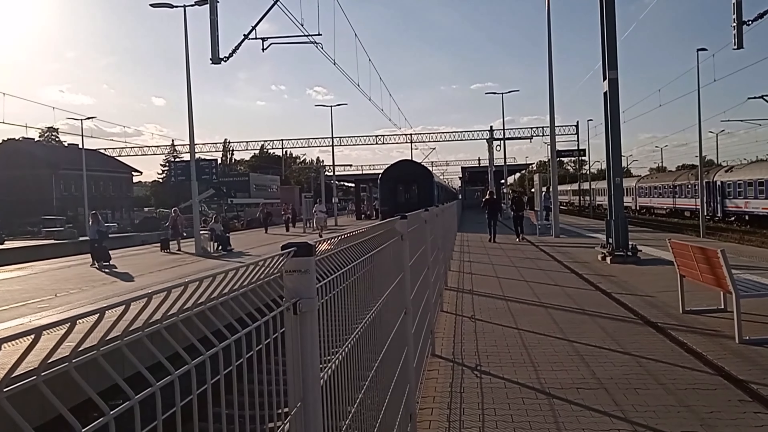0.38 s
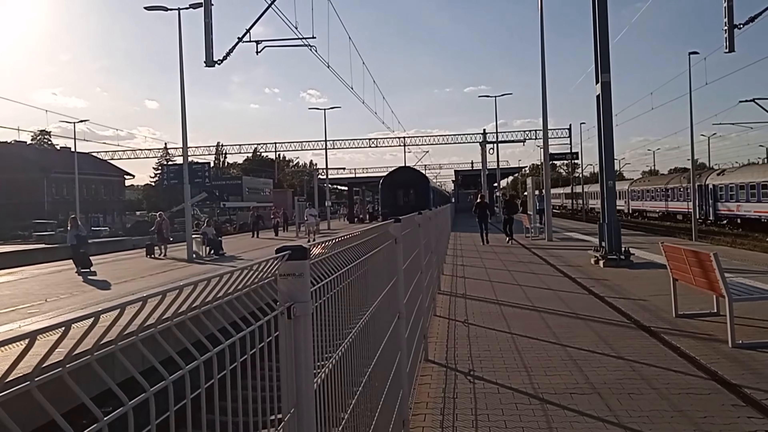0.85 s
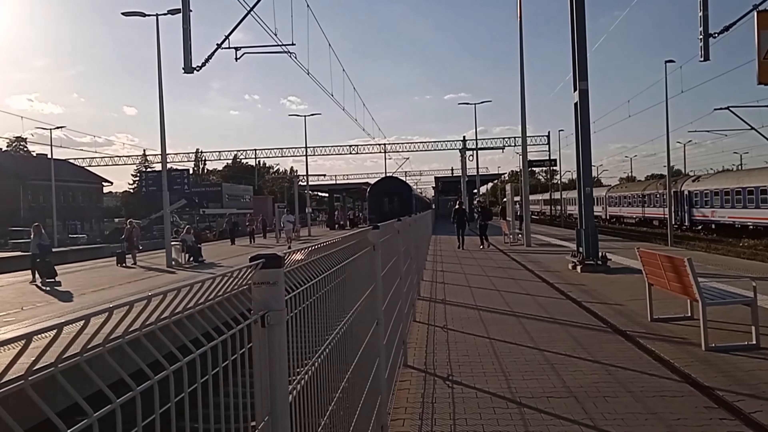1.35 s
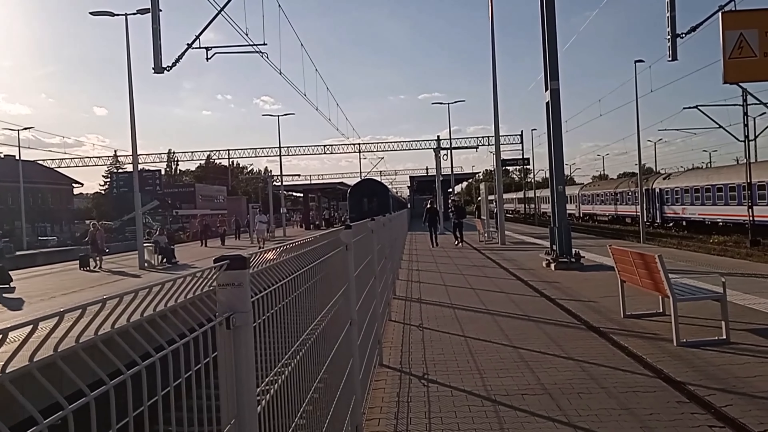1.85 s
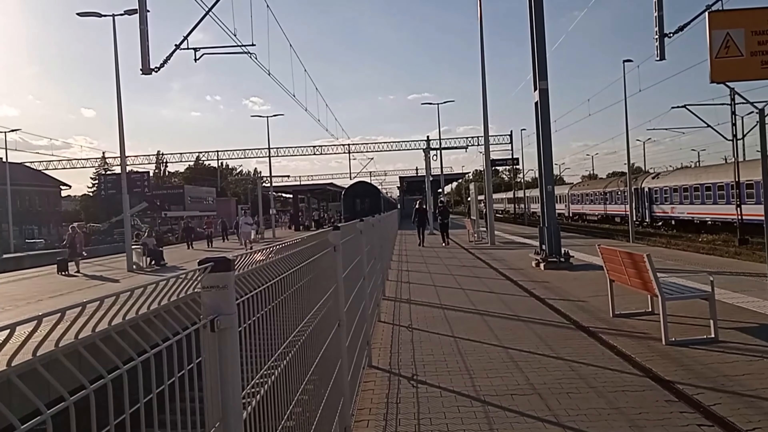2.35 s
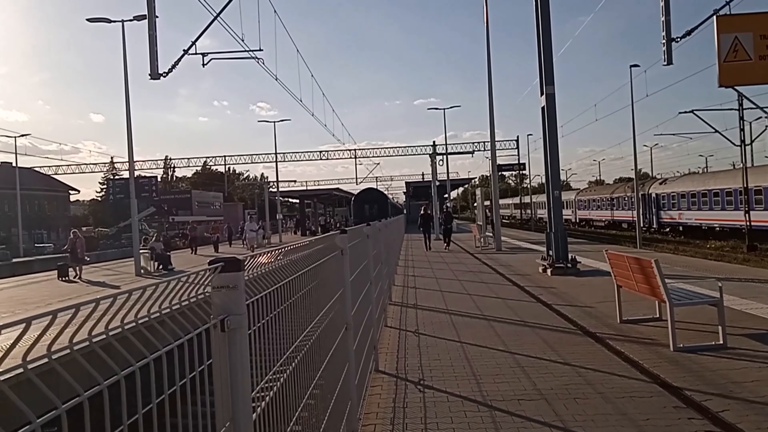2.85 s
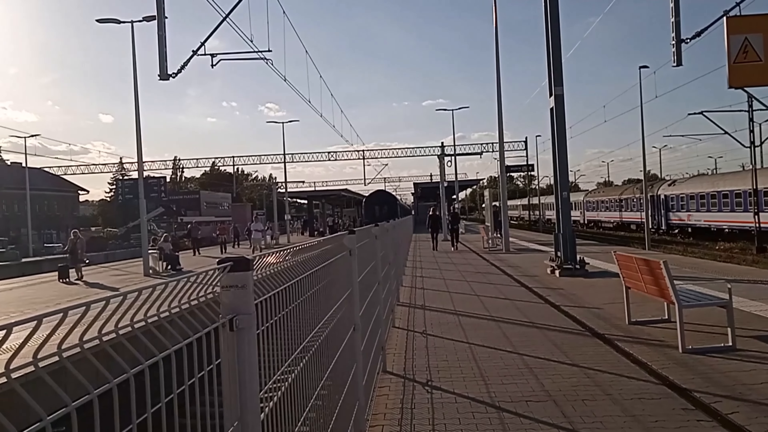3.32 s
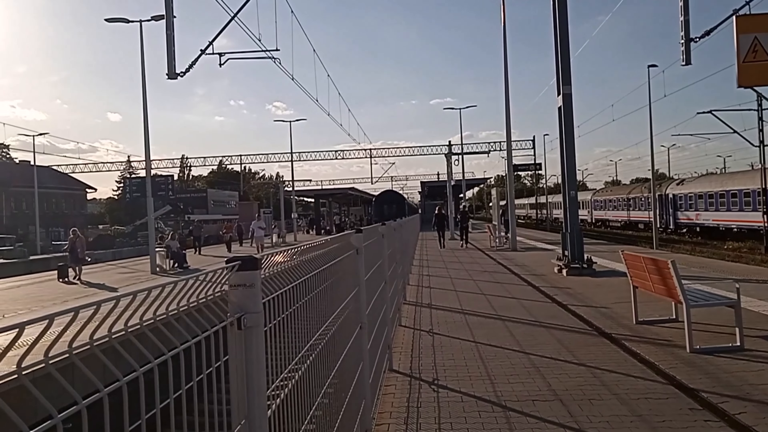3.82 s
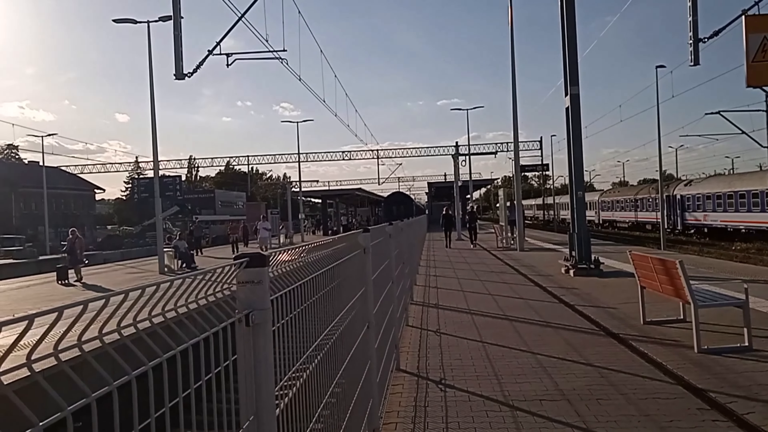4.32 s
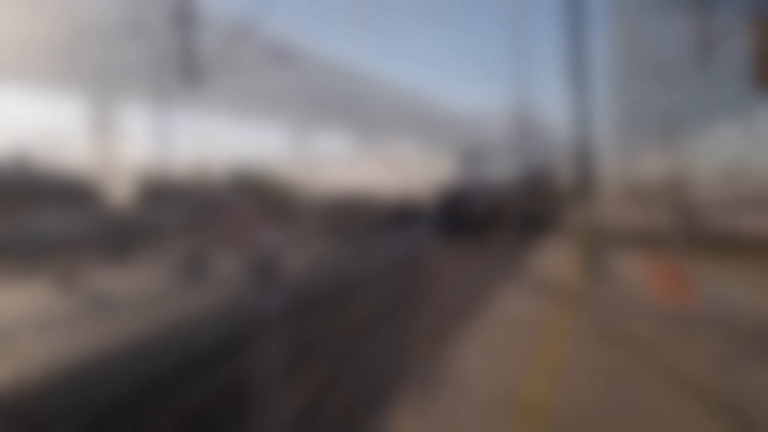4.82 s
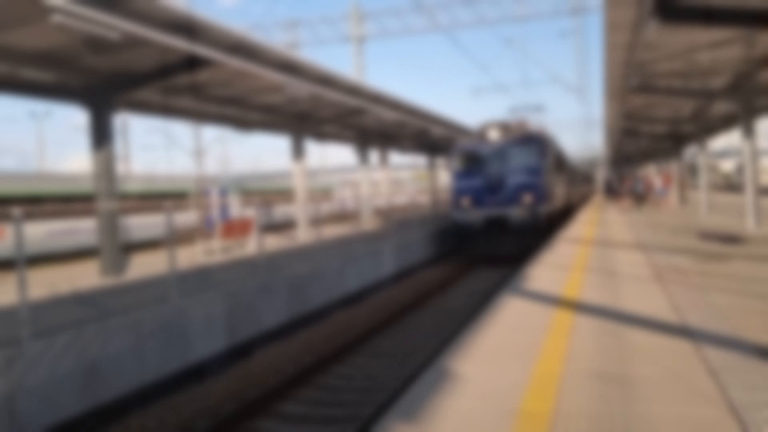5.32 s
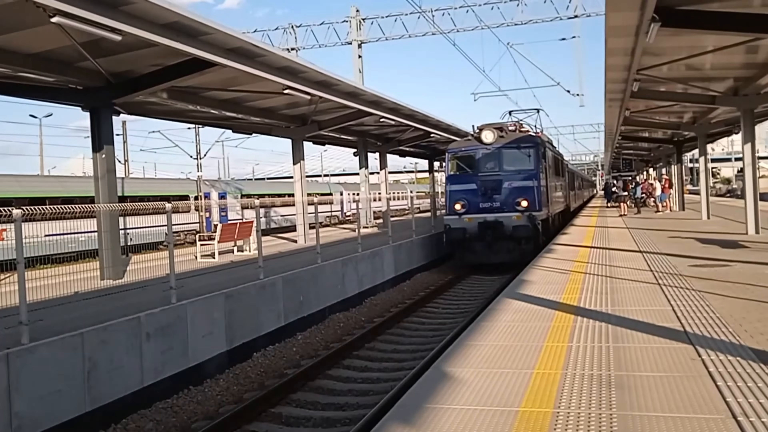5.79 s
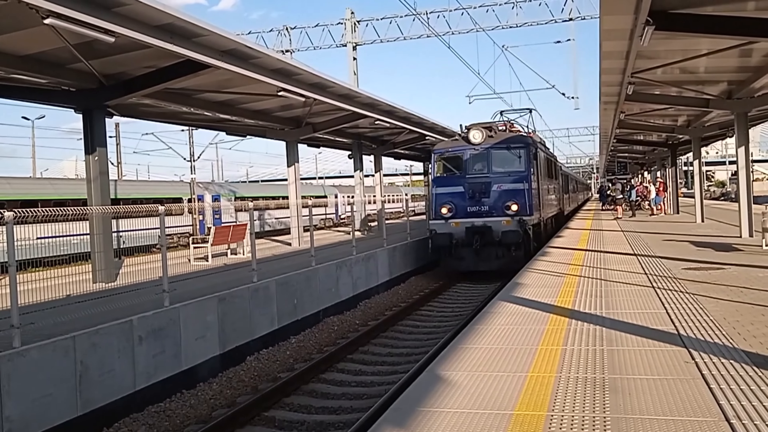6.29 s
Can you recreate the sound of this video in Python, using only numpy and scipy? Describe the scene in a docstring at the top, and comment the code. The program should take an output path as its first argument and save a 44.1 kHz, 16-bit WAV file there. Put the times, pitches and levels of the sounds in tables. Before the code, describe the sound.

From 0 s, on an open platform, a train brakes while moving away. Near-pure whistling tones around 4 to 7 kHz overlap with noisy metallic ringing, above steel hiss and a low rumble strongest in the first second. From about 0.8 s a grainy grinding near 2 kHz joins, with a low groan. Between 1.3 and 1.6 s a handful of tiny dry knocks tick by. The upper tone throbs quickly, about eleven times a second; shrill bursts thicken and strengthen from 2.5 to 4.7 s, while rumble fades and hiss briefly dips. From 4.6 s a crossfade brings in a roofed platform: a rough electric motor hum near 270 Hz, climbing slightly, with a wavering drone. A sharp 5.2 kHz squeal flares at 5 s. At 5.4 s the braking noise cuts dead. Until about 6.6 s the much quieter hum continues over dull roar and a barely audible distant squeal.

```python
"""An open platform, with a braking train squealing away from the microphone; then a roofed platform.
Out in the open, wheels sing as near-pure tones and ring as families of narrow noise-driven modes,
over rumble, a few dry knocks and the broad noise hiss of rubbing steel. A crossfade leads under the roof,
where a slow electric locomotive hums in rough motor orders and a noisy drone, with a dull roar of
coloured noise and a faint far squeal behind it. A moment later the braking train is cut off at once."""
import sys
import numpy as np
from scipy import signal
from scipy.fft import rfft, irfft, next_fast_len
from scipy.io import wavfile

SR = 44100
rng = np.random.default_rng(int(sys.argv[2]) if len(sys.argv) > 2 else 0)


def log_audio(samples):
    """Write samples as a 16-bit WAV file to the path given in sys.argv[1]."""
    # one column per channel
    frames = np.atleast_2d(samples).T
    # limit to full scale, then quantise
    limited = np.clip(frames, -1, 1)
    pcm = np.round(limited * 32767).astype(np.int16)
    wavfile.write(sys.argv[1], SR, pcm)


def gain_from_db(level_db):
    """Turn a decibel level (scalar or array-like) into a linear amplitude factor."""
    decades = np.asarray(level_db, float) / 20
    return 10 ** decades


N = 293691
TIME_S = np.arange(N) / SR


def in_time(rows):
    """Columns of a curve table, interpolated sample by sample."""
    at_s, *columns = np.transpose(rows)
    return [np.interp(TIME_S, at_s, column) for column in columns]


def rms_one(x):
    """Scales to unit power."""
    return x / np.sqrt(np.mean(x ** 2) + 1e-20)


def drift(rate_hz):
    """Slow random wander of spread 1: white noise through a double pole, at a fortieth of the sample rate."""
    pole = np.exp(-80 * np.pi * rate_hz / SR)
    white = rng.standard_normal(N // 40 + 2002)
    slow = signal.lfilter([1], [1, -2 * pole, pole * pole], white)[2000:]  # start-up left out
    return np.interp(np.arange(N) / 40, np.arange(len(slow)), rms_one(slow))


def spells(rows, slope_db_per_s):
    """Level in dB: spells hold from start to end and slope away on both sides; the loudest rules."""
    levels = []
    for start_s, end_s, db in rows:
        # a spell that ends before its start never quite reaches its level
        outside_s = np.maximum(np.maximum(start_s - TIME_S, TIME_S - end_s), 0)
        levels.append(db - slope_db_per_s * outside_s)
    return np.max(levels, axis=0)


def coloured(spectrum, low_hz, high_hz, patchy_db):
    """Noise of a given colour, unit power between two edges before each half octave flickers by itself."""
    size = next_fast_len(N)
    hz = np.maximum(np.fft.rfftfreq(size, 1 / SR), 1)
    at_hz, at_db = np.transpose(spectrum)
    colour = gain_from_db(np.interp(np.log(hz), np.log(at_hz), at_db))
    bins = rfft(rng.standard_normal(size)) * colour
    half_octaves = 2 * np.log2(np.clip(hz, at_hz[0], at_hz[-1]) / at_hz[0])  # above the lowest point
    out = 0
    for k in range(int(half_octaves.max()) + 2):
        band = irfft(bins * np.clip(1 - abs(half_octaves - k), 0, 1), size)[:N]
        out = out + band * gain_from_db(patchy_db * drift(24.0))
    return out / np.std(irfft(bins * (hz > low_hz) * (hz < high_hz), size))


def rubbed(pitches_hz, modes, patchy_db):
    """Friction noise through each mode's resonator twice; modes swell and fade singly, unit power in all."""
    out = 0
    for hz, (width_hz, db) in zip(pitches_hz, modes):
        pole = np.exp(-np.pi * 1.5 * width_hz / SR)  # two wider resonators in a row narrow to the width
        section = [1, 0, -1, 1, -2 * pole * np.cos(2 * np.pi * hz / SR), pole * pole]
        rung = rms_one(signal.sosfilt([section, section], rng.standard_normal(N)))
        out = out + rung * np.sqrt(width_hz) * gain_from_db(db + patchy_db * drift(10.1))
    return rms_one(out)


def tone(hz, db, rough, rate_hz):
    """A self-sustained tone; roughness spreads part of its power into a noisy skirt."""
    wobble = 1 + rough * (drift(rate_hz) + 1j * drift(rate_hz))
    wobble = wobble / np.sqrt(1 + 2 * rough ** 2)
    turning = np.exp(2j * np.pi * np.cumsum(hz) / SR)
    return np.sqrt(2) * gain_from_db(db) * np.real(wobble * turning)


# brake pressure: (time [s], level [dB about usual])
BRAKE_PRESSURE = [(0, 4), (.12, 2), (.5, -0.5), (.85, 5), (1.05, -3), (1.28, 3), (1.9, -2.5), (2.02, 1.5),
                  (2.4, -0.5), (2.65, 0), (3.35, -2.5), (3.45, 2), (3.72, 0.5), (3.82, 6), (4.25, 6),
                  (4.5, 2.5), (4.7, -1.5), (4.8, 2), (4.87, 3), (5.0, 1.5), (5.4, 12)]


def braking(usual_db, share, off_db, db_per_s):
    """Level in dB of a layer that answers brake pressure, the near shoe's grip and the passing time."""
    bite_s, release_s, ramp_s = .77, 4.97, .14  # the near shoe grips fully between bite and release
    off = np.clip(np.maximum(bite_s - TIME_S, TIME_S - release_s) / ramp_s, 0, 1)
    return usual_db + share * in_time(BRAKE_PRESSURE)[0] + off_db * off + db_per_s * TIME_S


# brief dips, full in rumble and hiss, slight in the noisy wheel modes: (time [s], level [dB])
BRIEF_DIPS = [(0.459, -19), (0.503, -14), (2.524, -14), (3.751, -20), (4.01, -22), (4.152, -26),
              (4.452, -26), (4.869, -14)]


def dips_db():
    """Level in dB that dips briefly now and then, each dip a bell curve in time."""
    dip_s = .008
    return sum(db * np.exp(-((TIME_S - at_s) / dip_s) ** 2) for at_s, db in BRIEF_DIPS)


# dull roar under the roof: (frequency [Hz], relative level per hertz [dB])
ROOF_ROAR_COLOUR = [(20, -54), (60, -7), (120, -9), (200, -3), (300, -5.5), (420, -7.5), (700, -9.5),
                    (1000, -11), (1600, -12.5), (2200, -11.5), (2800, -18.5), (3300, -30), (4000, -36.5),
                    (7400, -40), (8000, -56)]
# modes of a far squeal: (pitch [Hz]), then (width [Hz], relative level per hertz of width [dB])
FAR_SQUEAL_HZ = [6600, 5090, 5590, 6050]
FAR_SQUEAL_MODES = [(60, -0.5), (30, -4), (50, -6.5), (35, -10)]


def roofed_platform():
    """Distant background under the roof: a roar of coloured noise and a faint squeal of noise-driven modes."""
    roar = gain_from_db(-44) * coloured(ROOF_ROAR_COLOUR, 320, 2200, patchy_db=2.5)
    return roar + gain_from_db(-67) * rubbed(FAR_SQUEAL_HZ, FAR_SQUEAL_MODES, patchy_db=5.5)


# rumble, then its deep part: (frequency [Hz], relative level per hertz [dB])
RUMBLE_SPECTRUM = [(120, -36), (200, -13.5), (297, -11.5), (453, -2), (514, -13), (609, -15.5), (951, -4.5),
                   (1070, -13), (1500, -24), (1950, -43), (3300, -120)]
DEEP_SPECTRUM = [(20, -48.5), (50, -29.5), (90, -9), (160, -0.5), (220, -4.5), (300, -23)]
# swells of the deep part: (start [s], end [s], level [dB])
DEEP_SPELLS = [(0, 6.2, -59), (0, .2, -53), (.22, 0.25, -48), (.44, 0.86, -48), (.55, 0.735, -46),
               (.75, 0.97, -51.5), (1.5, 1.5, -56), (2.44, 2.52, -56.5), (3.3, 4.4, -57.5),
               (3.94, 3.5, -56)]


def receding_rumble():
    """Coloured noise that recedes with the train, over a deep part that swells and sinks; both dip."""
    rumble = gain_from_db(-47.5 - 3 * TIME_S) * coloured(RUMBLE_SPECTRUM, 300, 560, patchy_db=2.9)
    deep_db = spells(DEEP_SPELLS, slope_db_per_s=88.5)
    deep = gain_from_db(deep_db) * coloured(DEEP_SPECTRUM, 40, 230, patchy_db=3.1)
    return (rumble + deep) * gain_from_db(dips_db())


# hiss of rubbing steel, middle and treble: (frequency [Hz], relative level per hertz [dB])
HISS_COLOUR = [(650, -20), (1100, -11), (1500, -11), (2100, 1.5), (2700, -2.5), (3900, -7.5), (4700, -8),
               (5200, -36.5)]
TREBLE_COLOUR = [(4300, -22), (4900, -4.5), (5300, -2.5), (6400, -6), (7200, -8.5), (7450, -15),
                 (7750, -6.5), (8200, -13), (8450, -13)]
# weak modes in each hiss: (pitch [Hz]), then (width [Hz], relative level per hertz of width [dB])
FAINT_PITCHES = [3300, 2790, 2620, 3640, 1725, 2430, 3530]
FAINT_MODES = [(150, -2.5), (80, 1), (76.4, 1), (42, -2), (50, -4.5), (36, -0.5), (25, -3.5)]
FADING_PITCHES = [5080, 5590, 5700, 5930, 6022, 6640, 7650, 7750, 7884, 8117, 8270]
FADING_MODES = [(72, 0), (34, 0), (98, -11), (50, -1), (30, 0.5), (45, 0), (50, -4.5), (40, -8), (14, -15),
                (14, -13), (20, -3.5)]  # strongest while the train is near
# answers to the brake: (usual level [dB], share of pressure swing, change with the shoe off [dB], [dB/s])
HISS_ANSWER = (-43.5, .5, -2.55, -0.6)
TREBLE_ANSWER = (-45, -0.12, 2.5, -1.5)


def rubbing_steel():
    """Broad friction noise with weak modes in it; its middle and treble answer the brake and both dip."""
    hiss = coloured(HISS_COLOUR, 2454, 4000, patchy_db=3.1)
    hiss = hiss + gain_from_db(2.5) * rubbed(FAINT_PITCHES, FAINT_MODES, patchy_db=3.5)
    treble = coloured(TREBLE_COLOUR, 7050, 8300, patchy_db=3.4)
    treble = treble + gain_from_db(6.5) * rubbed(FADING_PITCHES, FADING_MODES, patchy_db=1.0)
    both = gain_from_db(braking(*HISS_ANSWER)) * hiss + gain_from_db(braking(*TREBLE_ANSWER)) * treble
    return both * gain_from_db(dips_db())


# dry knocks: (time [s], level before damping and soft start [dB], ring [Hz])
KNOCKS = [(1.267, -25, 1500), (1.295, -26, 1550), (1.329, -28, 1550), (1.368, -29, 1450), (1.39, -28, 1750),
          (1.447, -27, 1650), (1.5, -19, 1560), (1.594, -22, 1800)]


def knocks():
    """Short dry knocks, each a quickly damped ring with a soft start."""
    out, t = np.zeros(N), np.arange(2000) / SR
    t60_s = .009
    for at_s, db, hz in KNOCKS:
        at = round(at_s * SR)
        decay = gain_from_db(db - 60 * t / t60_s)
        soft_start = 1 - np.exp(-t / 0.00009)
        out[at:at + len(t)] += decay * soft_start * np.sin(2 * np.pi * hz * t)
    return out


# motor pitch: (time [s], frequency [Hz])
MOTOR_PITCH = [(4.55, 255.4), (5.0, 270.1), (5.2, 277.4), (5.5, 282), (6, 287.6), (6.66, 287.2)]
# motor load: (time [s], level [dB about usual])
MOTOR_SWELL = [(4.55, 2), (5.1, 0.8), (5.34, 4), (5.7, -1.5), (5.82, -3), (5.95, -0.3), (6.2, 0),
               (6.4, -3.5), (6.66, 1.5)]
# motor orders: (multiple of the pitch, relative level [dB], roughness)
ORDERS = [(1, 1, 0.7), (2, -7, 1.5), (3, -7.5, 2.5)]
# drone modes: (pitch [Hz]), then (width [Hz], relative level per hertz of width [dB])
DRONE_PITCHES = [230, 180, 415, 690]
DRONE_MODES = [(21, 1), (14, -18), (62, -10.5), (33.3, -15.5)]
# drone swells: (start [s], end [s], level [dB])
DRONE_SWELLS = [(4.55, 5.32, -42), (5.55, 6.1, -44), (6.22, 6.3, -41), (6.3, 6.66, -44.5)]


def locomotive():
    """Rough motor orders on one pitch that climbs and levels off, with a drone of noise-driven modes."""
    pitch_hz = in_time(MOTOR_PITCH)[0]
    motor_db = -44 + in_time(MOTOR_SWELL)[0]
    motor = sum(tone(k * pitch_hz, motor_db + db, rough, rate_hz=7.8 * k) for k, db, rough in ORDERS)
    drone_db = spells(DRONE_SWELLS, slope_db_per_s=72)
    return motor + gain_from_db(drone_db) * rubbed(DRONE_PITCHES, DRONE_MODES, patchy_db=4.0)


def wheel_family(level_db, pitches_hz, modes):
    """A family of noisy wheel modes, which partly ring on through the dips."""
    return gain_from_db(level_db + 0.17 * dips_db()) * rubbed(pitches_hz, modes, patchy_db=2.5)


# families that answer the brake: (pitch [Hz]), then (width [Hz], relative level per hertz of width [dB])
GROAN_PITCHES = [950, 845]
GROAN_MODES = [(60, 4), (60, -6)]
GRIND_PITCHES = [2140, 2070, 2220, 2305, 2400]
GRIND_MODES = [(22, 0), (72, -6), (120, -7), (35, -5), (116, -13.5)]
SKIRT_PITCHES = [4230, 4345, 4460]
SKIRT_MODES = [(130, -1), (50, 2), (70, -1)]
# answers to the brake: (usual level [dB], share of pressure swing, change with the shoe off [dB], [dB/s])
GROAN_ANSWER = (-48.5, 0.37, -1, 0.6)
GRIND_ANSWER = (-39.5, 0.78, -35, 0.71)
SKIRT_ANSWER = (-39, 0.14, -7, 0.92)


def braked_wheels():
    """Noise-driven modes that follow the brake: a low groan, a grainy grind, a skirt about the upper tone."""
    groan_db = braking(*GROAN_ANSWER) - 7 * np.maximum(TIME_S - 4.6, 0)  # dies away from 4.6 s
    grind_db = braking(*GRIND_ANSWER) + 2 * drift(27)  # flickers grainily
    out = wheel_family(groan_db, GROAN_PITCHES, GROAN_MODES)
    out = out + wheel_family(grind_db, GRIND_PITCHES, GRIND_MODES)
    return out + wheel_family(braking(*SKIRT_ANSWER), SKIRT_PITCHES, SKIRT_MODES)


# mid and high squeal: (pitch [Hz]), then (width [Hz], relative level per hertz of width [dB])
MID_PITCHES = [5372, 5412, 5250, 5120]
MID_MODES = [(30.8, 6.5), (20, -0.5), (69, -9.5), (97, -5.5)]
HIGH_PITCHES = [6944, 6980, 6912, 6850, 7350, 7130, 7300, 6245, 7040]
HIGH_MODES = [(25, 1), (22, -3.5), (24, -0.5), (50, -7), (22, -2.5), (15, -14.5), (40, -15.5), (80, -7.5),
              (40, -9.5)]
# their spells: (start [s], end [s], level [dB])
MID_SOUNDS = [(0, 2.8, -44), (.1, 0.15, -36), (.3, 0.7, -41), (.88, 0.94, -36), (1.4, 3.7, -41),
              (3.0, 3.5, -36.5), (3.65, 5.3, -34), (4.4, 7.8, -40)]
HIGH_SOUNDS = [(0, 0.59, -40), (.62, 4.7, -35), (1.85, 2.18, -31.5), (2.68, 2.92, -31), (3.3, 3.45, -32.5),
               (4.1, 4.03, -28.5), (4.7, 5.4, -33.5)]


def squealing_wheels():
    """Mid and high squeal: two families of noise-driven modes that come and go in spells."""
    slope_db_per_s = 54.5
    mid = wheel_family(spells(MID_SOUNDS, slope_db_per_s), MID_PITCHES, MID_MODES)
    return mid + wheel_family(spells(HIGH_SOUNDS, slope_db_per_s), HIGH_PITCHES, HIGH_MODES)


# bursting family: (pitch [Hz]), then (width [Hz], relative level per hertz of width [dB])
BURST_PITCHES = [6370, 6465, 6555, 6330]
BURST_MODES = [(22.2, 3), (25, -16), (70, -9), (49.7, -6.5)]
# bursts: (time [s], reference level for tone and noise [dB])
BURST_PEAKS = [(.32, -37), (.8, -27), (1.07, -33.5), (1.35, -31), (1.64, -36), (1.74, -42), (2.03, -35),
               (2.41, -33), (2.54, -31.5), (2.68, -28), (2.94, -29.5), (3.15, -27.5), (3.34, -24),
               (3.63, -28), (3.76, -25), (3.92, -26), (4.14, -24.5), (4.33, -25.5), (4.53, -25),
               (4.66, -27), (4.74, -27), (4.765, -31)]
# quieter bed under them: (start [s], end [s], level [dB])
BED_SPELLS = [(0, 2.5, -41), (2.5, 4, -35.5), (3.35, 4, -41), (3.62, 4.76, -31.5), (4.78, 6.9, -39)]


def bursting_wheel():
    """A mode that comes in bursts: a rough sung core, and a noisy family that also sounds between them."""
    hold_s, slope_db_per_s = 0.021, 197  # held this long on each side of the peak
    held = [(at_s - hold_s, at_s + hold_s, db) for at_s, db in BURST_PEAKS]
    bursts_db = spells(held, slope_db_per_s)
    core = tone(np.full(N, BURST_PITCHES[0]), bursts_db - 5.5, rough=.4, rate_hz=12.0)
    noise_db = np.maximum(bursts_db - 1.5, spells(BED_SPELLS, slope_db_per_s))
    return core + wheel_family(noise_db, BURST_PITCHES, BURST_MODES)


# split upper wheel tone: (time [s], middle frequency [Hz], spacing [Hz])
SPLIT_PITCH = [(0, 4385, 12.4), (1.25, 4384, 12.6), (1.75, 4384, 11.6), (2.2, 4385, 11.6),
               (2.8, 4387, 11.6), (3.3, 4388, 11), (4, 4385, 9.8), (5, 4387, 9)]
# spells of its lower, middle and upper line, a list each: (start [s], end [s], level [dB])
SPLIT_SOUNDS = [
    [(0, .55, -37), (.1, .25, -29.5), (.85, 1.3, -34), (1.3, 1.52, -39.5), (1.98, 2.3, -30),
     (2.3, 2.72, -31.5), (3, 4.78, -38), (3.68, 4.15, -31.5)],
    [(.75, 1.15, -48), (1.62, 1.8, -41.5), (1.88, 2.3, -32.5), (2.3, 2.62, -34.5), (2.7, 4.78, -53.5)],
    [(0, .5, -43), (.65, 1.05, -38), (1.1, 1.3, -32), (1.5, 2.1, -35), (2.18, 2.55, -32.5),
     (2.55, 3.3, -35.5), (3.3, 3.45, -31.5), (3.62, 3.72, -29.5), (3.72, 4.25, -31.5), (4.4, 4.78, -33)],
]


def split_wheel_tone():
    """Three near-pure lines that throb at their spacing, until the wheel falls silent."""
    middle_hz, spacing_hz = in_time(SPLIT_PITCH)
    carrier = 2 * np.pi * np.cumsum(middle_hz) / SR
    throb = 2 * np.pi * np.cumsum(spacing_hz) / SR
    throb = throb - throb[round(2.209 * SR)]  # the lines nearly align in phase at 2.209 s
    dying_db = 200 * np.maximum(TIME_S - 4.78, 0)
    out = 0
    for side, rows in zip((-1, 0, 1), SPLIT_SOUNDS):
        level = gain_from_db(spells(rows, slope_db_per_s=50) - dying_db)
        out = out + np.sqrt(2) * level * np.cos(carrier + side * throb + 0.3 * drift(12.0))
    return out


# single singing wheels: (pitch at 0 s [Hz], rise [Hz/s], roughness)
SINGING_WHEELS = [(4271, 10, .4), (5224, 2, .3), (6184, 14, .5), (6303, 5, .7), (3178, 0, .2),
                  (2308, 0, .5), (3400, 0, .4), (2138, 0, .6), (5160, 0, 2.0), (5410, 0, .6), (5590, 0, .8),
                  (6020, 0, .4)]
# spells of each, in the same order, a list each: (start [s], end [s], level [dB])
SINGING_SPELLS = [
    [(.58, 1.1, -42), (.81, .86, -36), (1.16, 1.33, -31.5), (1.5, 1.77, -38), (2.01, 2.08, -34),
     (2.18, 2.56, -38), (2.68, 2.8, -37), (2.9, 2.97, -41), (3.26, 3.33, -33), (3.33, 3.52, -37),
     (3.65, 4.28, -37), (4.4, 4.97, -33), (4.97, 5.03, -40)],
    [(2.66, 2.76, -47), (3.05, 3.7, -45), (3.78, 3.84, -40), (3.9, 4.5, -47), (4.55, 4.9, -39),
     (4.9, 5.0, -28), (5.03, 5.06, -24), (4.94, 4.99, -21.5), (5.1, 5.4, -42)],
    [(.1, .6, -45), (.68, 1.12, -37), (.85, .95, -33), (1.12, 1.7, -47), (1.92, 2.15, -43), (2.7, 2.8, -46)],
    [(0, .6, -43), (.6, 1.15, -38), (1.2, 3.2, -44), (1.7, 1.78, -35), (2.0, 2.05, -36), (3.35, 3.43, -34),
     (3.75, 4.7, -41)],
    [(.14, .42, -42), (.6, .82, -51)],
    [(5.22, 5.4, -54), (5.35, 5.38, -34)],
    [(3.9, 4.45, -50), (4.15, 4.3, -45)],
    [(.86, .95, -39), (1.25, 1.4, -43), (2.04, 2.25, -37), (2.25, 2.6, -41), (2.7, 2.95, -44),
     (3.75, 4.2, -41), (4.84, 4.89, -37)],
    [(4.8, 5.4, -38), (5.28, 5.38, -30)],
    [(5.08, 5.32, -36)],
    [(.09, .15, -36), (.42, .52, -41), (.75, .9, -44)],
    [(5.22, 5.36, -41)],
]


def singing_wheels():
    """Self-sustained tones, from near-pure to rough, some creeping up in pitch."""
    out = 0
    for (start_hz, rise, rough), rows in zip(SINGING_WHEELS, SINGING_SPELLS):
        level_db = spells(rows, slope_db_per_s=230)
        # a rougher singer also wavers faster
        out = out + tone(start_hz + rise * TIME_S, level_db, rough, rate_hz=30 * rough)
    return out


def scene():
    """Both places, with nothing heard above about 8.5 kHz; a crossfade joins them, the first cut in mid-sound."""
    top = signal.cheby2(16, 50, 8580, fs=SR, output="sos")
    wheels = braked_wheels() + squealing_wheels() + bursting_wheel() + split_wheel_tone() + singing_wheels()
    open_platform = signal.sosfilt(top, receding_rumble() + rubbing_steel() + knocks() + wheels)
    under_roof = signal.sosfilt(top, roofed_platform() + locomotive())
    fade_s, fade_out_s, fade_in_s, cut_s = 4.58, 1.3, .6, 5.406  # linear fades; the fade-out is slower
    fade_out = np.clip(1 - (TIME_S - fade_s) / fade_out_s, 0, 1) * (TIME_S < cut_s)
    fade_in = np.clip((TIME_S - fade_s) / fade_in_s, 0, 1)
    return (open_platform * fade_out + under_roof * fade_in)[None]


def top_cut(x):
    """Nothing passes above the cut-off."""
    return signal.sosfilt(signal.butter(12, 15700, fs=SR, output="sos"), x)


def record(dry):
    """The microphone rolls off the deepest bass."""
    bass_cut = signal.butter(2, 57, "high", fs=SR, output="sos")
    mix = signal.sosfilt(bass_cut, dry)
    return top_cut(mix)


dry = scene()
out = record(dry)
log_audio(out)
```